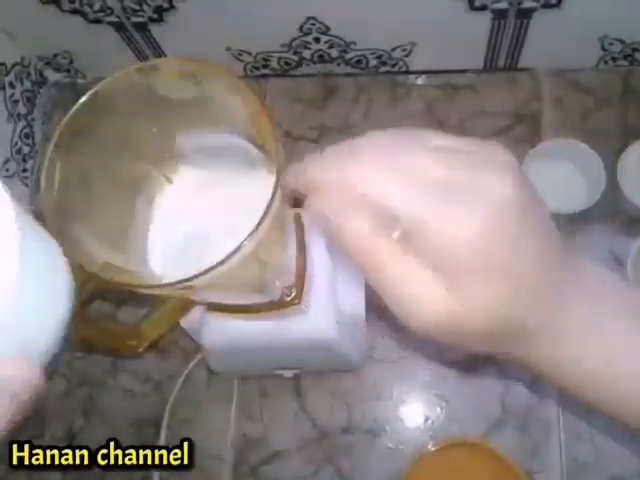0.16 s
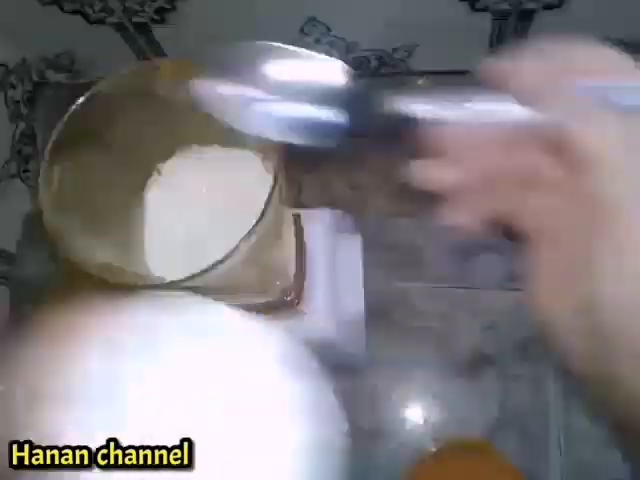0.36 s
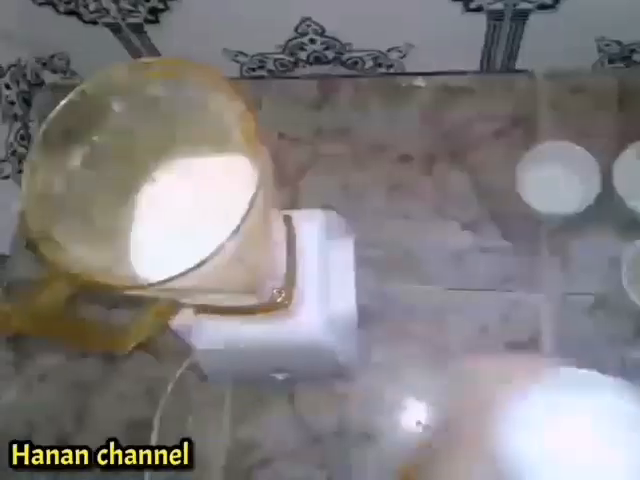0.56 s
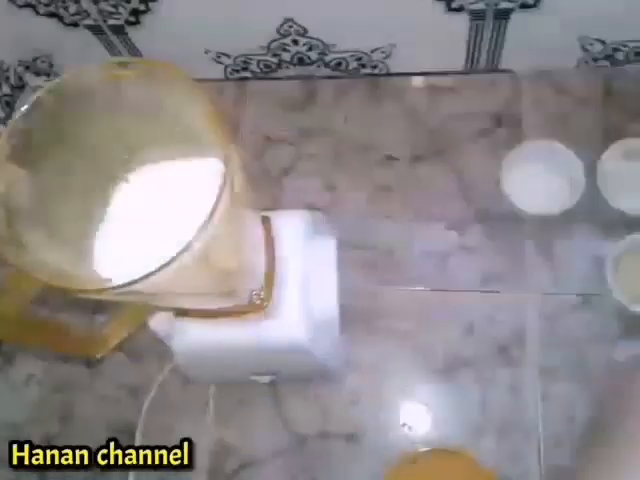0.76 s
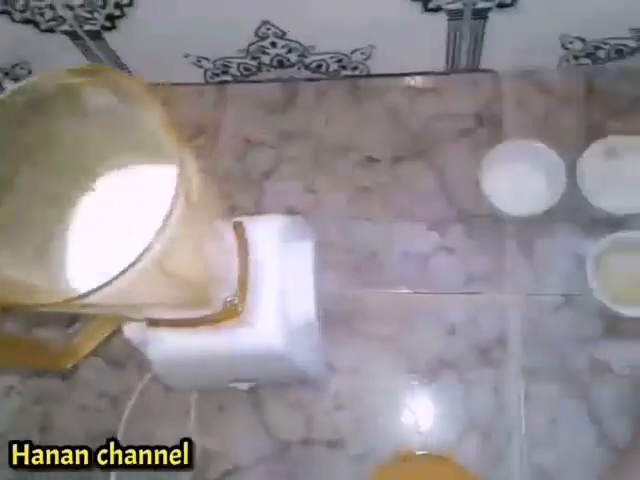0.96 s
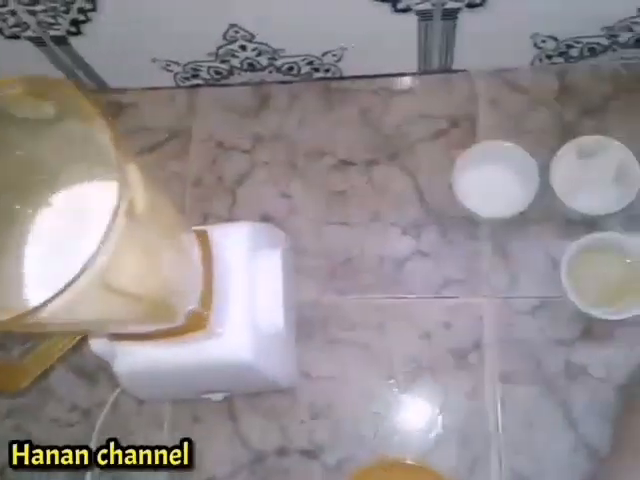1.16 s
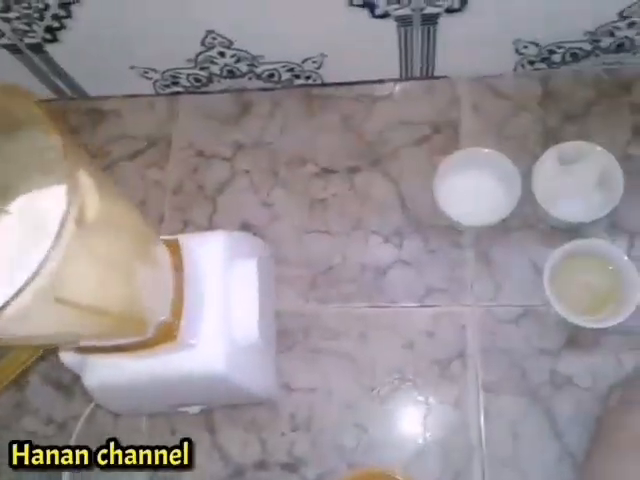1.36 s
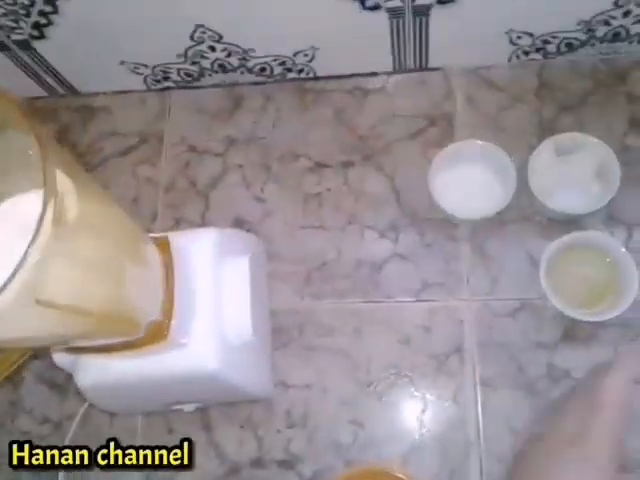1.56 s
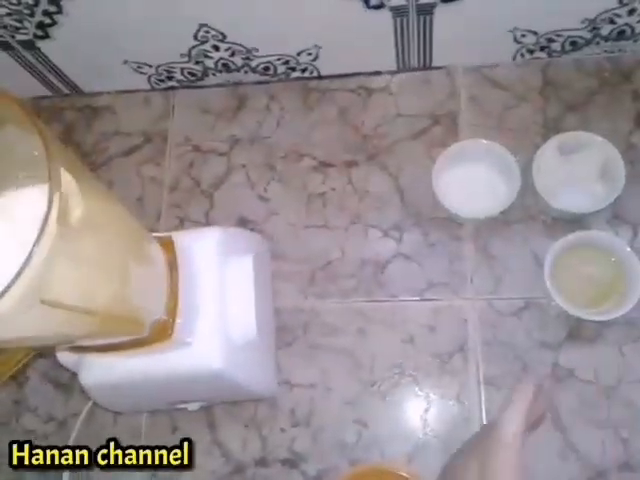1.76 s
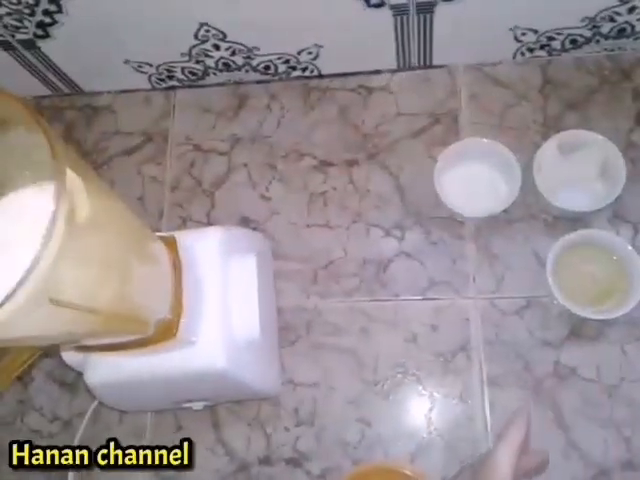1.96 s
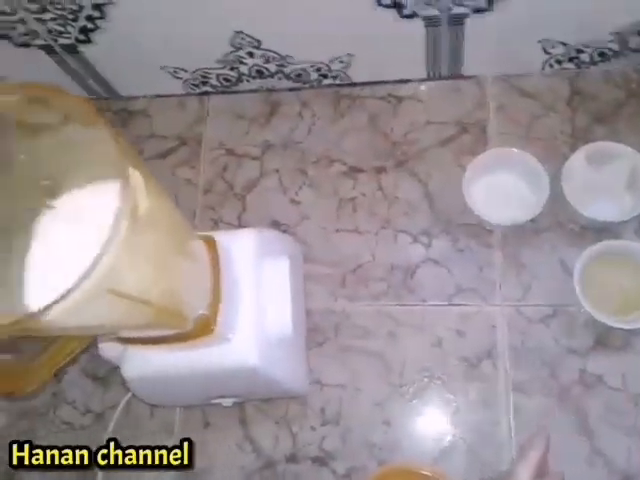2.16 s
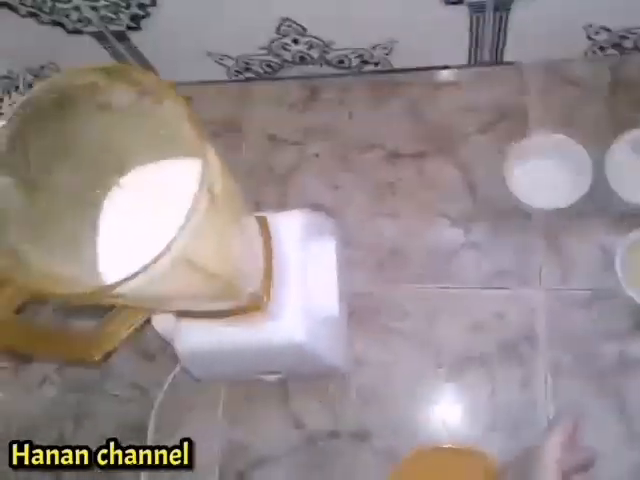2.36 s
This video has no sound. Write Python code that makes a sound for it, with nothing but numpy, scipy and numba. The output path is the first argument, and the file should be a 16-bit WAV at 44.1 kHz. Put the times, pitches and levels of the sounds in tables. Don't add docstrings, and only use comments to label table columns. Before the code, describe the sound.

Metal spoon clinks over faint low appliance hum and room air in a small hard kitchen. At 0.23 and 0.38 s it knocks a plastic blender jug, hollow and rattling, the second harder, with short echoes. From 1.32 to 1.48 s it taps a china bowl, the worktop booming softly; at 1.76-1.9 s rapid clinks and a shrill scrape, then quiet. Close phone microphone, peaks clipped.

```python
import sys
import numpy as np
from scipy import signal
from scipy.fft import rfft, irfft
from scipy.io import wavfile
from scipy.ndimage import uniform_filter1d
from numba import njit

SR = 44100
rng = np.random.default_rng(int(sys.argv[2]) if len(sys.argv) > 2 else 0)


def natural_amplitude(level_db):
    exponent = np.asarray(level_db, float) / 20
    return 10 ** exponent


def dump(signal):
    limited = np.clip(np.atleast_2d(signal).T, -1, 1)
    pcm = np.round(limited * 32767).astype(np.int16)
    wavfile.write(sys.argv[1], SR, pcm)


N = 110250
T = np.arange(N) / SR


def coloured(points):
    p = np.array(points, float)
    f = np.arange(N // 2 + 1) * SR / N + 1
    db = np.interp(np.log(f), np.log(p[:, 0]), p[:, 1], left=-90, right=-90)
    x = irfft(rfft(rng.standard_normal(N)) * natural_amplitude(db), N)
    return x / x.std()


def walk(rate_hz):
    k = int(SR / rate_hz)
    steps = np.repeat(rng.standard_normal(N // k + 1), k)
    return 0.95 * uniform_filter1d(uniform_filter1d(steps, k), k)[:N]


def fade(start, t60, rise=0.0006):
    age = np.maximum(T - start, 0)
    return (1 - np.exp(-age / rise)) * natural_amplitude(-60 * age / t60)


def strike(start, modes, spot_db, cycles=1):
    hz, db, t60, *rise = np.array(modes, float).T[:, :, None]
    rise = rise[0] if rise else cycles / hz
    first = int(np.ceil(start * SR))
    age = T[first:first + SR // 2] - start
    sign = (-1.) ** np.arange(len(hz))[:, None]
    level_db = db + np.array(spot_db)[:len(hz), None] - 60 * age / t60
    ring = sign * natural_amplitude(level_db) * (1 - np.exp(-age / rise)) ** 2
    out = np.zeros(N)
    out[first:first + len(age)] = np.sum(ring * np.sin(2 * np.pi * hz * age), axis=0)
    return out


# [t/s, low level/dB, high level/dB]
ROOM_TONE = [
    (0, -45, -45.5),
    (.04, -52.5, -54.5),
    (.2, -52.5, -57.5),
    (.7, -53.5, -53),
    (1.25, -54.5, -56),
    (1.68, -50.5, -52),
    (2.05, -60.5, -61.5),
    (2.299, -59, -63),
    (2.5, -64.5, -62),
]
# [f/Hz, level/dB]
AIR_LOW = [(15, -50), (25, -15.5), (107, -4), (156, -14), (173, -15.5), (206, -8), (437, -11), (519, -10),
           (1500, -19), (1950, -50.5), (3300, -120)]
# [f/Hz, level/dB]
AIR_HIGH = [(1300, -7.5), (2050, 0), (3000, -10.5), (4300, -6), (5300, -19), (6900, -18.5), (8500, -34),
            (15400, -26.5)]
# [f/Hz, level/dB, wobble/dB]
HUM_LINES = [(105.3, -57.5, 5.5), (146, -57, 3.5), (341, -61.5, 5), (390, -62.5, 0), (420, -75.5, 7.5),
             (2100, -69, 4.5), (11800, -85.5, 1)]


def kitchen():
    rows = np.array(ROOM_TONE).T
    low, high = (np.interp(T, rows[0], db) for db in rows[1:])
    air = coloured(AIR_LOW) * natural_amplitude(low + 5.9 * walk(6.3))
    air = air + coloured(AIR_HIGH) * natural_amplitude(high + 1.3 * walk(45))
    rumble = natural_amplitude(-64) * coloured([(20, -2.5), (60, 1.5), (110, 1), (180, -16)])
    gain_db = 0.48 * (np.minimum(low, -52) + 55.5)
    hum = 0
    for hz, db, wobble_db in HUM_LINES:
        level = natural_amplitude(db + gain_db + wobble_db * walk(24))
        hum = hum + level * np.sin(2 * np.pi * hz * T + 2.0 * walk(1.5))
    return air + rumble + hum


# [t/s, ring level/dB, crack level/dB, crack t60/s]
JUG_KNOCKS = [
    (0.2349, -2, -3.5, 0.11),
    (0.381, 1, -2.5, 0.18),
]
# [f/Hz, level/dB, t60/s, build-up/s]
JUG_FIRST_SPOT = [(110, -13, 0.14, 0.035), (349.4, -19.5, .4, 0.016), (474, -7.5, 0.35, 0.0033),
                  (494.3, -8, 0.4, .008), (576, -14.5, .12, .005), (672, -3.5, .07, .006),
                  (818, -14.5, 0.34, .002), (840, -9.5, 0.3, .002), (920, -17, .15, .002),
                  (1284, -17, 0.15, .002), (1620, -20, 0.28, .006), (1846, -8.5, .1, .003),
                  (2060, -11.5, .12, .002), (2900, -14, .12, .002)]
# [f/Hz, level/dB, t60/s, build-up/s]
JUG_SECOND_SPOT = [(105, -21, 0.36, .03), (300, -18.5, .35, .012), (351.8, -13.5, 0.39, 0.013),
                   (442.8, 4.5, 0.2, 0.015), (491, 11, 0.22, .032), (664.5, -3.5, .09, 0.0044),
                   (832, -10.5, 0.36, .003), (845.6, -1.5, 0.23, 0.0015), (935, -6, 0.23, 0.0032),
                   (1244, -7.5, .22, .008), (1526, -17, .2, 0.0026), (1793, -7, .12, .003),
                   (1908, -13.5, 0.29, 0.0014), (1938, -11.5, 0.32, .003)]
# [f/Hz, level/dB]
JUG_RATTLE = [(120, -21.5), (420, -10.5), (720, 0.5), (1400, -15.5), (2000, -4.5), (3300, -17), (4300, -11),
              (7000, -27), (8500, -43.5), (15400, -43)]


def jug():
    rattle = coloured(JUG_RATTLE)
    ring, crack = 0, 0
    for knock, modes in zip(JUG_KNOCKS, (JUG_FIRST_SPOT, JUG_SECOND_SPOT)):
        start, ring_db, crack_db, crack_t60 = knock
        ring = ring + natural_amplitude(ring_db) * strike(start, modes, np.zeros(len(modes)))
        crack = crack + natural_amplitude(crack_db) * rattle * fade(start, crack_t60)
    return ring, crack


# [f/Hz, t60/s]
ROOM_DECAY = [(125, 0.51), (500, 0.49), (2000, .32), (6000, 0.31), (14000, .22)]


def room(x):
    delay_s, level_db = 0.0027, -8.5
    p, tail = np.array(ROOM_DECAY), 0
    for hz in 88 * 2. ** np.arange(8):
        band = coloured([(hz / 2, -30), (hz / 2 ** .5, -3), (hz, 0), (hz * 2 ** .5, -3), (hz * 2, -30)])
        t60 = np.interp(np.log(hz), np.log(p[:, 0]), p[:, 1])
        tail = tail + band * np.sqrt(hz / t60) * fade(delay_s, t60, 0.00078)
    return natural_amplitude(level_db) * signal.fftconvolve(x, tail / np.sqrt(np.sum(tail ** 2)))[:N]


# [t/s, f/Hz, level/dB, t60/s]
TOUCHES = [(.781, 2050, -44, .03), (1.461, 3190, -11, .085), (1.724, 6800, -52, .04),
           (1.722, 1250, -36, .06), (1.734, 1520, -27, .08), (1.738, 6300, -42, .06),
           (1.744, 6650, -45, .05), (1.773, 14700, -26, .04), (1.802, 4330, -27, .06),
           (1.803, 3200, -19, .08), (1.804, 4640, -30, .1)]
# [t/s, bowl level/dB, spoon level/dB, bright crack level/dB, dull knock level/dB]
BOWL_CLINKS = [(1.32, -21, -71, -53.5, -17), (1.329, -24, -79.5, -60, -24.5),
               (1.367, -49, -54, -45.5, -31.5), (1.400, -50.5, -69, -52.5, -26.5),
               (1.415, -26.5, -57, -43.5, -19.5), (1.424, -52, -52, -30.5, -32),
               (1.460, -13, -19.5, -12, -12), (1.466, -29, -29, -21, -13), (1.4758, -32, -30, -28.5, -21.5),
               (1.620, -66.5, -52, -66, -61), (1.726, -53, -61, -50.5, -51),
               (1.7612, -21.5, -36.5, -20.5, -25), (1.7699, -22, -48.5, -32.5, -32),
               (1.801, -20, -51, -22, -41), (1.805, -12, -46, -21, -30.5), (1.821, -14.5, -46, -19, -28),
               (1.850, -37.5, -50, -19, -42.5), (1.862, -15, -45, -26.5, -43),
               (1.878, -19, -25, -27.5, -25)]
# [f/Hz, level/dB, t60/s]
BOWL_MODES = [(1135, -25, 0.069), (1435, -10.5, 0.033), (1546, -7, 0.11), (1765, -8, 0.07),
              (1820, -15, 0.036), (2364, -5, 0.045), (2860, -16, .04), (3197, -5, 0.061),
              (3600, -23, 0.022), (4440, -19.5, .04), (4610, -24, .04)]
# [f/Hz, level/dB, t60/s]
SPOON_EDGE_MODES = [(6640, -3, .035), (6990, -2, .035), (7500, -8, .025), (7950, -3, .035), (8250, -9, .03),
                    (10890, -10, .025), (12080, -14, .025), (13670, -7, .025), (14630, -9, .025),
                    (15200, -14, .025)]
# [f/Hz, level/dB]
BRIGHT_CRACK = [(300, -42), (1490, -1), (2700, -18), (3190, 6), (3700, -5.5), (7000, -19), (8800, -23.5),
                (15400, -42)]
# [f/Hz, level/dB]
DULL_KNOCK = [(300, -13), (900, -8), (1520, 7), (2200, -1.5), (2700, -8.5), (3230, -5.5), (4500, -37),
              (7500, -54)]


def clinks():
    rise_cycles, spot_spread_db = 1.5, 2.5
    crack, knock, out = coloured(BRIGHT_CRACK), coloured(DULL_KNOCK), 0
    spots = spot_spread_db * rng.standard_normal((len(BOWL_CLINKS), 30))
    for (start, bowl_db, spoon_db, crack_db, knock_db), spot in zip(BOWL_CLINKS, spots):
        out = out + natural_amplitude(bowl_db) * strike(start, BOWL_MODES, spot, rise_cycles)
        out = out + natural_amplitude(spoon_db) * strike(start, SPOON_EDGE_MODES, spot[::-1], rise_cycles)
        out = out + natural_amplitude(crack_db) * crack * fade(start, 0.054)
        out = out + natural_amplitude(knock_db) * knock * fade(start, 0.08)
    for start, hz, db, t60 in TOUCHES:
        out = out + strike(start, [(hz, db, t60)], [0], rise_cycles)
    return out


# [t/s, f/Hz, level/dB, t60/s, rise/s]
LOW_THUMPS = [
    (1.428, 360, -33, 0.4, 0.012),
    (1.45, 108, -29, 0.38, 0.035),
    (1.773, 120, -23, 0.04, .002),
    (1.772, 362, -28, 0.3, .045),
]


def low_booms():
    out = 0
    for start, hz, db, t60, rise in LOW_THUMPS:
        out = out - natural_amplitude(db) * fade(start, t60, rise) * np.sin(2 * np.pi * hz * (T - start))
    return out


# [f/Hz, level/dB, t60/s, loudest at t/s, next antinode after/s]
SPOON_MODES = [(6035, -8, .06, 1.795, .17), (6400, -18, .03, 1.80, .1), (7012, -7, .06, 1.825, .12),
               (8010, -18, .02, 1.80, .1), (8962, -18, .05, 1.80, .08), (9170, -22, .05, 1.79, .09),
               (9780, -19, .05, 1.85, .08), (10865, -4, .05, 1.79, .065), (12075, -3, .04, 1.808, .044),
               (12400, -11, .05, 1.845, .06), (13400, -17, .05, 1.80, .07), (13680, -3, .05, 1.81, .07),
               (14620, -11, .035, 1.775, .072), (15200, -13, .04, 1.775, .09)]


def antinode_swell_db(loudest_s, gap_s):
    return 5 * np.cos(2 * np.pi * (T - loudest_s) / gap_s)


def rub(drive, modes):
    out = 0
    for hz, db, t60, *slide in modes:
        r = natural_amplitude(-60 / (t60 * SR))
        pole = r * np.exp(2j * np.pi * hz / SR)
        swell_db = antinode_swell_db(*slide) if slide else 4 * walk(35)
        ring = signal.lfilter([1], [1, -pole], drive * natural_amplitude(swell_db)).imag
        out = out + natural_amplitude(db) * np.sqrt(1 - r * r) * ring
    return out


def sing(push):
    out = 0
    for hz, db, _, loudest_s, gap_s in SPOON_MODES:
        level = natural_amplitude(-1 + db + antinode_swell_db(loudest_s, gap_s))
        out = out + level * push * np.sin(2 * np.pi * hz * T + 0.8 * walk(60))
    return out


# [t/s, bowl level/dB, spoon level/dB, rasp level/dB, dull drag level/dB]
SCRAPE_PUSH = [
    (1.69, -77, -86, -72.5, -53.5),
    (1.734, -55.5, -68.5, -61.5, -34),
    (1.758, -55.5, -56.5, -47, -31.5),
    (1.763, -52, -43, -38, -45),
    (1.776, -34, -20.5, -27, -35.5),
    (1.829, -44, -22.5, -28, -32),
    (1.85, -46.5, -21, -30.5, -35),
    (1.89, -50, -24.5, -32.5, -43),
    (1.902, -53, -53.5, -48.5, -62),
]
# [t/s, level/dB]
SPOON_CATCHES = [
    (1.7615, -13),
    (1.7727, -6),
    (1.797, -16),
    (1.839, -11),
    (1.846, -12),
    (1.867, -16),
    (1.881, -15),
]
# [f/Hz, level/dB]
RASP_COLOUR = [(250, -28), (1500, -4), (3200, -6), (5300, -20), (7000, -17), (8800, -26), (12400, -14),
               (15400, -16)]


def scrape():
    grit_per_s, grit_spread_db, loose_grit_db = 5000, 2.5, -5
    chance = rng.random((2, N))
    grit_size = natural_amplitude(-grit_spread_db * np.log(1 - chance[1]))
    grit = (chance[0] < grit_per_s / SR) * grit_size * rng.choice([-1, 1], N)
    grit = grit / grit.std() * natural_amplitude(2.5 * walk(90))
    rows = np.array(SCRAPE_PUSH).T
    pushes = [natural_amplitude(np.interp(T, rows[0], db, left=-120, right=-120)) for db in rows[1:]]
    bowl_push, spoon_push, rasp_push, drag_push = pushes
    rasp = coloured(RASP_COLOUR) * natural_amplitude(1.2 * walk(120))
    drag = coloured(DULL_KNOCK) * natural_amplitude(1.2 * walk(120))
    skips = np.zeros(N)
    for start, db in SPOON_CATCHES:
        skips[int(start * SR)] = natural_amplitude(db)
    spoon = rub(grit * spoon_push * natural_amplitude(loose_grit_db) + skips, SPOON_MODES) + sing(spoon_push)
    slide = rub(grit * bowl_push, BOWL_MODES) + rasp * rasp_push + drag * drag_push
    return slide, spoon


def scene():
    jug_ring, jug_crack = jug()
    slide, spoon = scrape()
    near = jug_crack + clinks() + slide
    echoes = room(near + natural_amplitude(-13) * jug_ring + natural_amplitude(-6) * spoon)
    return (jug_ring + spoon + near + echoes + low_booms() + kitchen())[None]


@njit
def follow(x, attack, release):
    out, e = np.empty(len(x)), 0.
    for i in range(len(x)):
        e += (abs(x[i]) - e) * (attack if abs(x[i]) > e else release)
        out[i] = e
    return out


def low_pass(x):
    return signal.sosfilt(signal.butter(12, 16640, fs=SR, output="sos"), x)


def record(dry):
    limit_db, ratio, attack_s, release_s = -6.5, 2.5, 0.0015, 0.049
    clip, offset = 0.97, -0.001
    loud = follow(dry[0], 1 / (attack_s * SR), 1 / (release_s * SR))
    x = dry * np.minimum(1, natural_amplitude(limit_db) / (loud + 1e-9)) ** (1 - 1 / ratio)
    x = x / (1 + np.abs(x / clip) ** 8) ** 0.125
    x = signal.sosfilt(signal.butter(1, 54, "high", fs=SR, output="sos"), x)
    x = signal.sosfilt(signal.ellip(10, 0.2, 60, 15500, fs=SR, output="sos"), x) + offset
    return low_pass(x)


dry = scene()
out = record(dry)
dump(out)
```